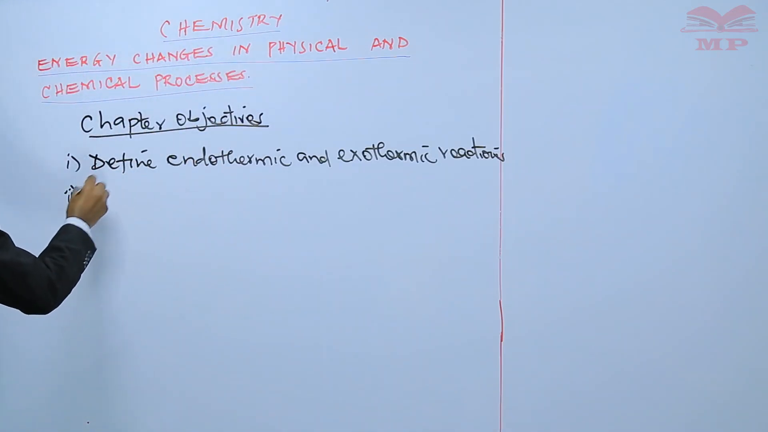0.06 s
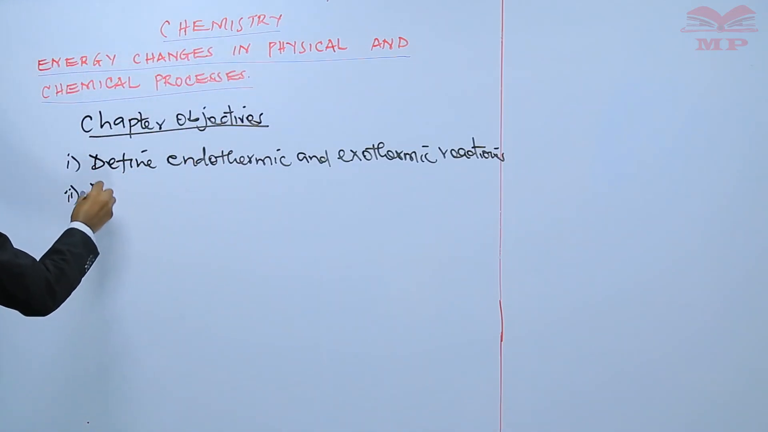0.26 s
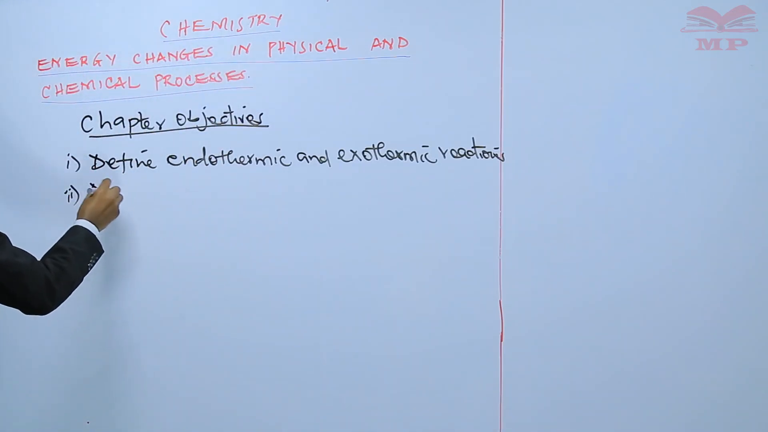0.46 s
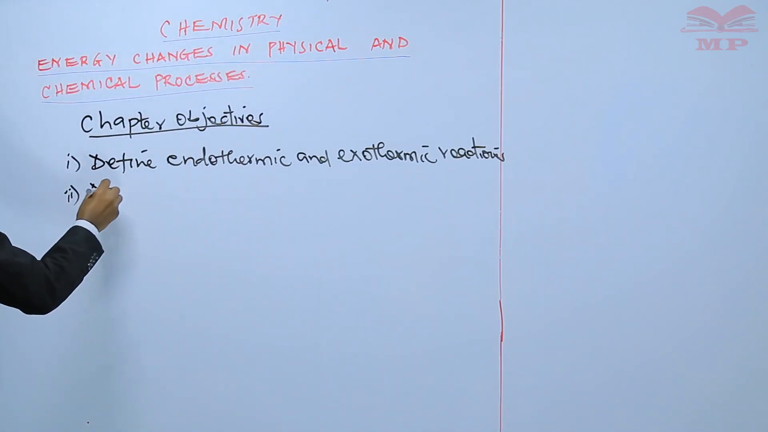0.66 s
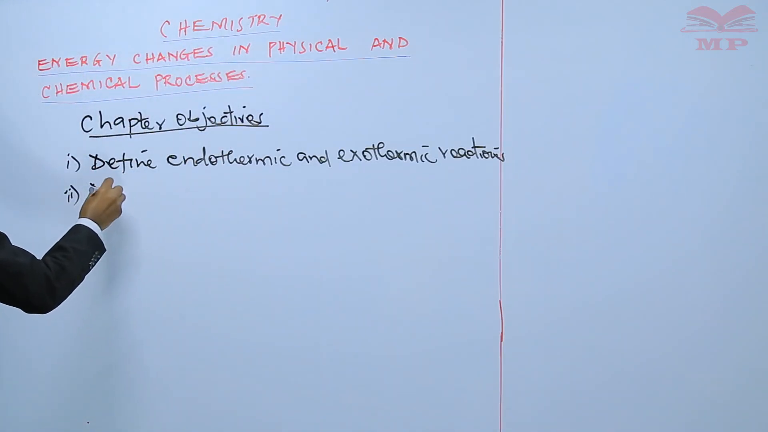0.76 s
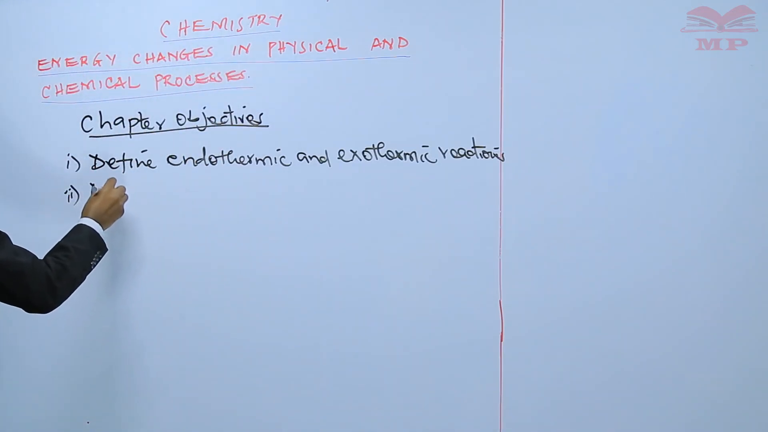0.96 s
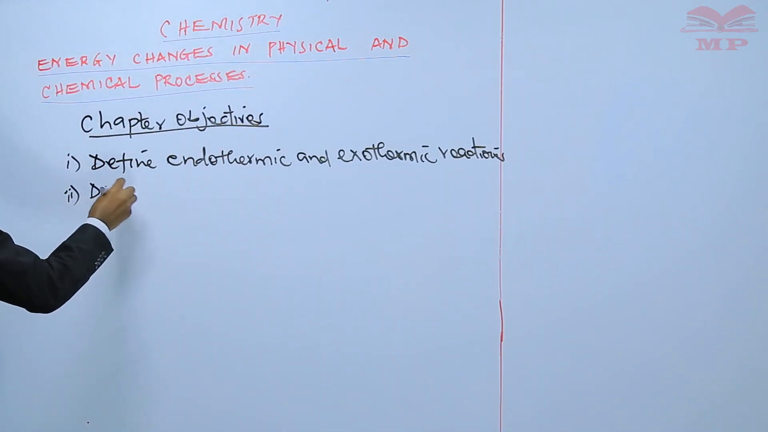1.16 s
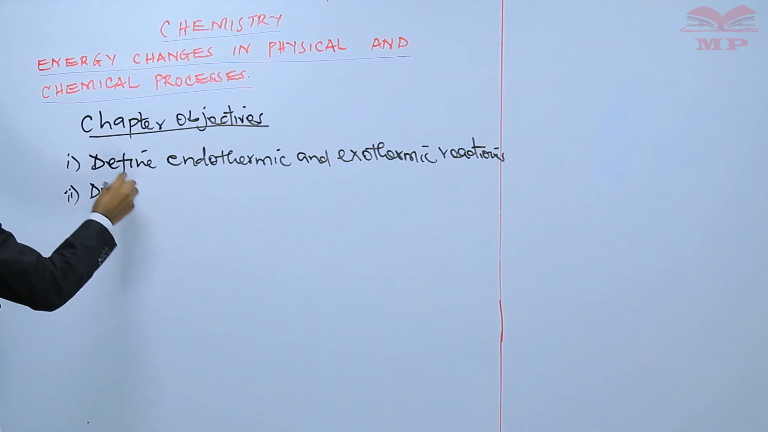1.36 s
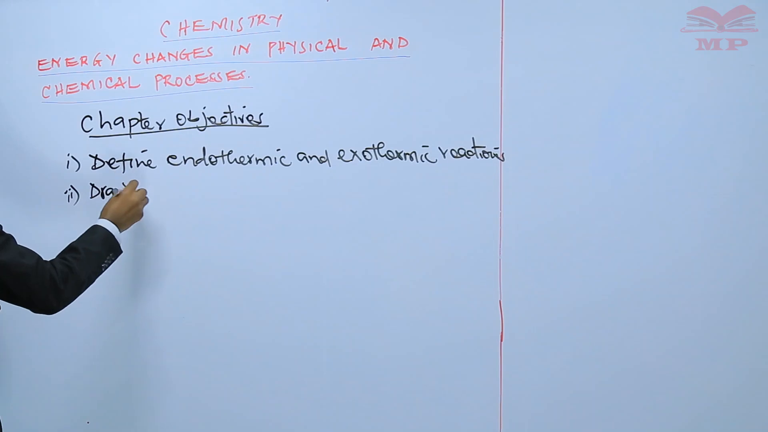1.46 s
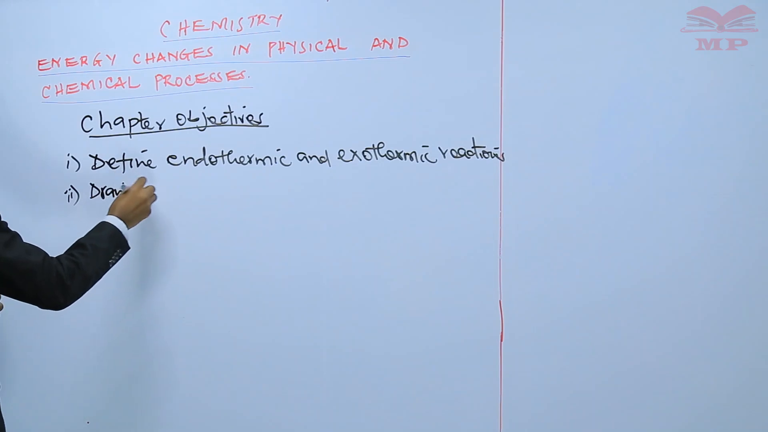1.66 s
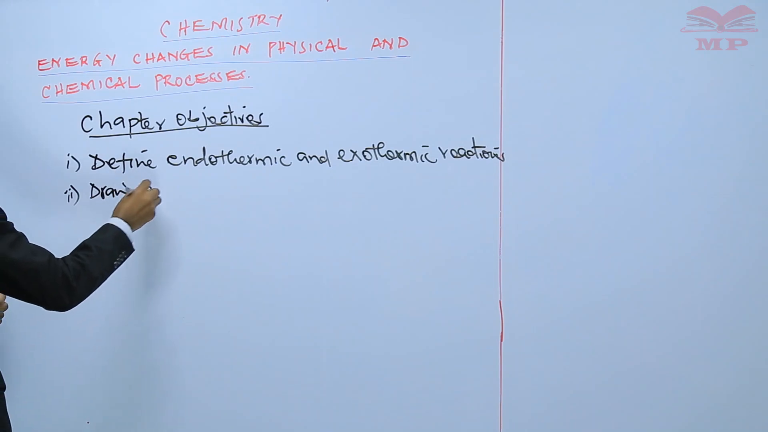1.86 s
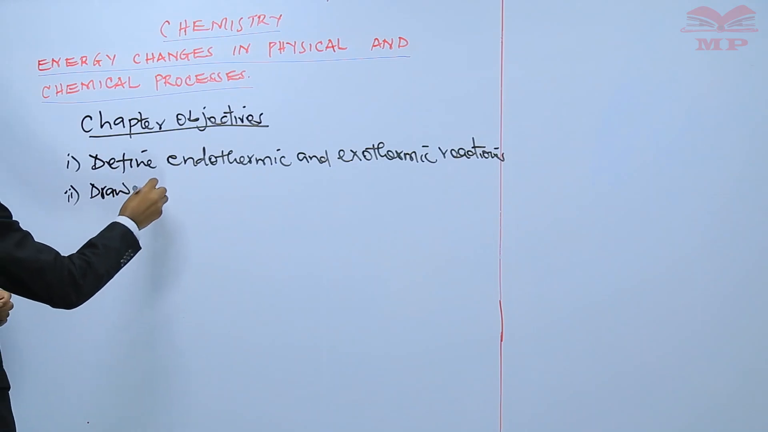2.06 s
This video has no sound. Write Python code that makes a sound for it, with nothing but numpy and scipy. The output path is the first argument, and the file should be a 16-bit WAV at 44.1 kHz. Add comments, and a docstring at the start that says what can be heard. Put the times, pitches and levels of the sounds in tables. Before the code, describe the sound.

Marker pen scratching short strokes on a thin whiteboard, brief squeaks and low thuds, quiet room.

```python
"""A felt marker writes quick strokes on a whiteboard, close up: tiny random slips ring its tip in a low,
a gliding middle and a high band, and make the thin board rumble and hiss. Stick-slip adds short squeaks,
gliding tones with one overtone. Soft contacts thud: a push, then decaying board modes. Once the hand
brushes the board, as noise in rising resonances. Behind lie a soft low rustle and a low thrum, both
filtered noise with drawn levels, and the shaped noise of a quiet classroom with a very short echo tail."""
import sys
import numpy as np
from scipy import signal
from scipy.fft import rfft, irfft
from scipy.io import wavfile
from scipy.ndimage import uniform_filter1d

SR = 44100
rng = np.random.default_rng(int(sys.argv[2]) if len(sys.argv) > 2 else 0)


def int16_out(signal):
    """Quantize to a 16-bit WAV file."""
    q = np.round(np.clip(np.atleast_2d(signal).T, -1, 1) * 32767)
    wavfile.write(sys.argv[1], SR, q.astype(np.int16))


N = 92610  # samples, 2.1 s


def amp(db):
    """Amplitude factor for a level in dB."""
    return 10 ** (np.asarray(db) / 20)


def evened(x):
    """Scales a sound to an RMS of one."""
    return x / np.sqrt(np.mean(x ** 2) + 1e-20)


def add(mix, start_s, sound):
    """Lays a sound into the mix at its start time, cut at the end of the mix."""
    part = mix[max(round(start_s * SR), 0):][:len(sound)]
    part += sound[:len(part)]


def resonate(x, hz, width):
    """A resonance, fixed or gliding, applied twice for steep sides: shift to 0 Hz, smooth, shift back."""
    turn = np.exp(2j * np.pi * np.cumsum(hz * np.ones(len(x))) / SR)
    r = np.exp(-np.pi * width / SR)
    smoothed = signal.lfilter([(1 - r) ** 2], [1, -2 * r, r * r], x / turn)
    return 2 * (turn * smoothed).real


def rings(x, table):
    """Sum of resonances of alternating sign, at an RMS of one."""
    return evened(sum((-1) ** k * amp(db) * resonate(x, hz, width)
                      for k, (hz, width, db) in enumerate(table)))


SWELL_POWER, FLOOR_SHARE = 2.0, 0.3  # sharpness of the peaked part; share of the flat-topped part


def swell(length, peak):
    """Pressure of one gesture: rises to the peak place and falls again."""
    u = np.arange(0, length, 1 / SR) / length
    peak = np.clip(peak, 0.05, 0.95)
    arch = np.sin(np.pi / 2 * np.minimum(u / peak, (1 - u) / (1 - peak)))
    flat_top = np.tanh(4 * arch)
    return FLOOR_SHARE * flat_top + (1 - FLOOR_SHARE) * arch ** SWELL_POWER


GRIT_DB, GUST_DB = 1.5, 1.5  # level spread in dB: grain (fast), gusts (slow)


def slips():
    """Dense tiny slips: noise of uneven size under a wavering pressure."""
    noise, fast, slow = rng.standard_normal((3, N))
    grit = GRIT_DB * evened(uniform_filter1d(fast, 60))
    gust = GUST_DB * evened(uniform_filter1d(slow, 600))
    return noise * amp(grit + gust)


# The pen strokes, each with its balance of tip bands and board rumble before the pressure swell:
# (start t/s, length t/s, peak place 0-1, low band level/dB, middle band level/dB, high band level/dB,
#  middle band start f/Hz, middle band end f/Hz, rumble drive level/dB)
PEN_STROKES = [(0.0, 0.087, 0.48, -66, -73, -63.5, 4630, 4460, -52.5),
               (0.216, .1, 0.26, -62, -83, -56.5, 4570, 4440, -49.5),
               (0.323, 0.12, 0.64, -66.5, -71.5, -61, 3420, 5140, -60.5),
               (0.57, 0.062, 0.1, -72.5, -77, -75.5, 4000, 4730, -62.5),
               (0.619, .1, 0.63, -64, -67.5, -66, 4030, 5200, -56),
               (0.71, 0.094, 0.55, -57, -60.5, -59, 3260, 4700, -55.5),
               (0.815, 0.086, 0.52, -68.5, -83, -67, 4600, 4600, -64.5),
               (1.017, 0.074, 0.31, -64.5, -85, -65, 3750, 3000, -56.5),
               (1.111, 0.073, 0, -69, -68.5, -66, 4540, 4450, -57),
               (1.165, 0.15, 0.68, -60, -65, -65, 4180, 4730, -56),
               (1.318, 0.073, 0.57, -67.5, -79.5, -72.5, 4640, 4300, -62),
               (1.696, .085, 0.52, -56.5, -57, -58.5, 4320, 5100, -45.5),
               (1.776, 0.12, 0.53, -68, -61, -58.5, 4200, 5160, -54),
               (1.856, 0.11, 0.66, -62.5, -61.5, -61.5, 4440, 4920, -70),
               (2.047, 0.094, 0.07, -69, -75.5, -68.5, 4800, 4720, -80)]
# Fixed rings of the felt tip, lower group: (f/Hz, width f/Hz per pass, relative level/dB)
LOW_TIP_RINGS = [(3150, 400, 0), (3650, 500, -1), (4150, 400, -6)]
# Fixed rings of the felt tip, upper group: (f/Hz, width f/Hz per pass, relative level/dB)
HIGH_TIP_RINGS = [(5665, 605, 5), (6374, 525, -2.5), (6896, 720, -6), (8450, 8000, -22)]
MID_WIDTH, NOTCH_HZ, NOTCH_Q, TIP_FROM_HZ = 750, 5230, 22, 2600  # width in Hz per pass
SKIN_HZ, SKIN_WIDTH, SKIN_DB = 1310, 1970, -5  # board skin: Hz, Hz per pass, gain in dB


def strokes():
    """Felt sliding: slips ring the tip and shake the board."""
    grit, hiss, shake = slips(), np.zeros(N), np.zeros(N)
    low = rings(slips(), LOW_TIP_RINGS)
    high = rings(slips(), HIGH_TIP_RINGS)
    for start, length, peak, low_db, mid_db, high_db, hz0, hz1, rumble_db in PEN_STROKES:
        shape = swell(length, peak)
        at = np.clip(round(start * SR) + np.arange(len(shape)), 0, N - 1)
        mid = evened(resonate(grit[at], np.linspace(hz0, hz1, len(at)), MID_WIDTH))
        tip = amp(low_db) * low[at] + amp(mid_db) * mid + amp(high_db) * high[at]
        add(hiss, start, shape * tip)
        add(shake, start, shape * amp(rumble_db))

    # the tip bands: one narrow notch, and nothing much below the low cut
    hiss = signal.lfilter(*signal.iirnotch(NOTCH_HZ, NOTCH_Q, fs=SR), hiss)
    b, a = signal.butter(2, TIP_FROM_HZ, "high", fs=SR)
    tip_hiss = signal.lfilter(b, a, hiss)

    # the board under the pen: its modes with 120 dB/s of extra damping
    t = np.arange(SR // 2) / SR
    drive = shake * rng.standard_normal(N)
    damped = board_ring() * amp(-120 * t)
    rumble = signal.fftconvolve(drive, damped / np.linalg.norm(damped))[:N]
    skin_hiss = amp(SKIN_DB) * resonate(drive, SKIN_HZ, SKIN_WIDTH)
    return tip_hiss + rumble + skin_hiss


# Short squeaks of the tip, level before a common lift and the fade-in and fade-out:
# (middle t/s, length t/s, start f/Hz, end f/Hz, level/dB, overtone relative level/dB,
#  roughness: 0 steady, 1 all flutter)
TIP_SQUEAKS = [(0.584, 0.025, 4100, 4710, -71.5, -33, 1.1), (0.668, .026, 4470, 4980, -56.5, -32, 0.3),
               (0.696, .03, 5400, 5850, -60, -26, 0.74), (0.755, .018, 4516, 4870, -41.5, -37, 0.06),
               (0.742, 0.011, 4500, 4230, -52, -30, 0.6), (0.765, 0.012, 4780, 4820, -49.5, -35, 0.2),
               (0.74, 0.027, 2936, 3190, -60.5, -22, 1), (0.798, .016, 2840, 2360, -53.5, -26, 0.31),
               (1.112, 0.017, 4500, 4170, -66, -30, 0.8), (1.171, .022, 2503, 2340, -49, -12.5, 0.14),
               (1.268, 0.0247, 3264, 3595, -59, -39, .9), (1.285, 0.0097, 2700, 2900, -52.5, -10, 0.2),
               (1.738, 0.044, 4400, 4846, -54.5, -26, 0.95), (1.845, .035, 4650, 4820, -63, -26, .6),
               (1.862, .016, 4850, 5400, -51.5, -29, 0.06)]
WAVER = 0.006  # RMS pitch wobble, share of the frequency
SQUEAK_LIFT_DB = 5.5


def squeaks():
    """Regular stick-slip: a short gliding whistle with one overtone."""
    out = np.zeros(N)
    wobble = evened(uniform_filter1d(rng.standard_normal(N), 120))
    flutter = evened(resonate(rng.standard_normal(N), 0, 440))  # low-passed noise
    for middle, length, hz0, hz1, db, over_db, rough in TIP_SQUEAKS:
        u = np.arange(0, length, 1 / SR) / length
        start = middle - length / 2
        first = round(start * SR)
        hz = (hz0 + (hz1 - hz0) * u) * (1 + WAVER * wobble[first:][:len(u)])
        grip = 1 - rough + rough * flutter[first:][:len(u)]
        turn = 2 * np.pi * np.cumsum(hz) / SR
        tone = np.sin(turn) + amp(over_db) * np.sin(2 * turn)
        fade = np.sin(np.pi * u) ** 1.25
        add(out, start, amp(db + SQUEAK_LIFT_DB) * grip * fade * tone)
    return out


# Modes of the thin board: (f/Hz, relative level/dB, time to fall by 60 dB t/s)
BOARD_MODES = [(50.6, -19.5, 0.77), (95.5, -14.5, 0.43), (115, -12, 0.38), (150, 1, .24), (163, -8, .3),
               (215.3, -6, 0.252), (278.5, -13.5, 0.17), (355, -8, 0.097), (407.4, -14.5, 0.17),
               (518, -16.5, 0.12)]
BUILD_CYCLES = 0.18  # build-up time constant, in cycles of each mode


def board_ring():
    """The board's answer to a short push; low modes take longer to build."""
    t = np.arange(SR // 2) / SR
    ring = np.zeros(len(t))
    for hz, db, t60 in BOARD_MODES:
        build = 1 - np.exp(-t * hz / BUILD_CYCLES)
        ring += amp(db - 60 * t / t60) * build * np.sin(2 * np.pi * hz * t)
    return ring


# Soft contacts with the board, level before the push and ring gains:
# (start t/s, level/dB, contact time t/ms: half the length of the whole push)
CONTACTS = [(.003, -46.5, 7), (0.2142, -26, 3.73), (0.997, -44, 8.6), (1.6897, -29.5, 3.92),
            (1.772, -38, 7.6), (2.045, -56.5, 1.2)]
PUSH_DB, RING_DB = 2, -1.5  # gains of the push and of the ringing modes


def knocks():
    """A soft contact pushes the board in, then its modes ring."""
    out, ring = np.zeros(N), board_ring()
    for start, db, contact_ms in CONTACTS:
        u = np.arange(0, 2 * contact_ms / 1000, 1 / SR) * 1000 / contact_ms - 1
        force = np.exp(-9 * u ** 2)
        push = (1 - 18 * u ** 2) * force  # the bell's curvature, sign turned
        add(out, start, -amp(db + PUSH_DB) * push)
        softened_ring = signal.fftconvolve(ring, force / force.sum())
        add(out, start + contact_ms / 2600, amp(db + RING_DB) * softened_ring)
    return out


# Resonances of the brushing hand: (start f/Hz, width f/Hz per pass, level/dB before the swell)
BRUSH_RINGS = [(797, 330, -59), (2140, 660, -61.5), (2660, 1300, -54.5)]
BRUSH_S, BRUSH_LENGTH_S, BRUSH_PEAK = 1.772, 0.093, 0.36  # start, length, peak place 0-1
BRUSH_RISE = 0.14  # share by which its rings climb


def brush():
    """The hand brushes along the board: one noise burst through rising resonances."""
    out, shape = np.zeros(N), swell(BRUSH_LENGTH_S, BRUSH_PEAK)
    noise = rng.standard_normal(len(shape))
    climb = np.linspace(1, 1 + BRUSH_RISE, len(shape))
    rub = sum(amp(db) * evened(resonate(noise, hz * climb, width)) for hz, width, db in BRUSH_RINGS)
    add(out, BRUSH_S, shape * rub)
    return out


# Level of the low rustle over time: (t/s, level/dB)
RUSTLE_CURVE = [(0, -66.5), (.15, -75), (.25, -69.5), (.5, -80), (.62, -74.5), (.68, -63.5), (.85, -68.5),
                (.98, -73), (1.1, -75.5), (1.28, -72.5), (1.4, -82.5), (1.65, -81.5), (1.75, -67),
                (1.88, -65), (1.95, -75.5), (2.1, -73)]
RUSTLE_HZ, RUSTLE_WIDTH = 310, 365  # width in Hz per pass


def rustle():
    """A soft low rustle around 310 Hz: uneven noise through one resonance, with its own drawn level."""
    t, db = np.transpose(RUSTLE_CURVE)
    level = amp(np.interp(np.arange(N) / SR, t, db))
    return level * evened(resonate(slips(), RUSTLE_HZ, RUSTLE_WIDTH))


# Level of the low thrum over time, before the final low cut: (t/s, level/dB)
THRUM_CURVE = [(0.0, -58), (0.16, -73), (0.26, -52), (0.5, -72), (0.69, -80), (0.77, -58), (1.24, -70.5),
               (1.3, -58), (1.48, -77), (1.65, -78), (1.74, -51), (2.1, -64)]
THRUM_HZ, THRUM_WIDTH = 54.5, 16  # width in Hz per pass


def thrum():
    """A low thrum near 54 Hz: noise through one narrow resonance, with a drawn level."""
    t, db = np.transpose(THRUM_CURVE)
    level = amp(np.interp(np.arange(N) / SR, t, db))
    return level * evened(resonate(rng.standard_normal(N), THRUM_HZ, THRUM_WIDTH))


# Spectrum of the room noise: (f/Hz, relative level/dB per Hz)
ROOM_SPECTRUM = [(35, -18), (52, 1), (65, -0.5), (80, 6.5), (150, 3), (200, -4.5), (270, -9.5), (500, -11),
                 (730, -11), (1440, -14.5), (5170, -24.5), (9000, -31), (15500, -30.5)]
# Slow swell of the room noise: (t/s, relative level/dB)
ROOM_CURVE = [(0, 2.5), (.5, 1.5), (.8, -0.5), (1.3, 1), (1.55, -0.5), (1.65, -3.5), (1.9, 2.5),
              (2.1, -0.5)]
ROOM_DB = -66.5  # level before the swell and the final low cut


def room_tone():
    """Quiet room noise, shaped in its spectrum, with a slow swell."""
    f, db = np.transpose(ROOM_SPECTRUM)
    t, swell_db = np.transpose(ROOM_CURVE)
    hz = np.fft.rfftfreq(N, 1 / SR)
    shape = amp(np.interp(np.log(hz + 1), np.log(f + 1), db))
    noise = irfft(rfft(rng.standard_normal(N)) * shape, N)
    return evened(noise) * amp(ROOM_DB + np.interp(np.arange(N) / SR, t, swell_db))


WET_DB, SIDE_DB, TAIL_S = -17.5, -44, 0.09  # tail gain, gain of its side part, time to fall by 60 dB


def scene():
    """Sums the near sounds, their short room tail and the background, with a faint stereo side."""
    near = strokes() + squeaks() + knocks() + brush()
    t = np.arange(SR // 2) / SR
    # noise tails, silent for the first 8 ms
    tails = rng.standard_normal((2, len(t))) * amp(-60 * t / TAIL_S) * (t > 0.008)
    tails = tails / np.linalg.norm(tails[0])
    wet, apart = signal.fftconvolve(near[None], tails, axes=1)[:, :N]
    mono = near + amp(WET_DB) * wet + room_tone() + thrum() + rustle()
    side = amp(SIDE_DB) * apart
    return np.array([mono + side, mono - side])


HISS_DB, HISS_FROM_HZ = -85, 4400
LOW_CUT_HZ, EDGE_HZ = 47.3, 15750  # low cut of each of two passes; upper band limit


def record(dry):
    """A double low cut, a faint hiss of opposite sign in the two channels, then the band limit."""
    b, a = signal.butter(1, HISS_FROM_HZ, "high", fs=SR)
    hiss = evened(signal.lfilter(b, a, rng.standard_normal(N)))
    cut = signal.butter(2, LOW_CUT_HZ, "high", fs=SR, output="sos")
    dry = signal.sosfilt(cut, signal.sosfilt(cut, dry))
    wired = dry + amp(HISS_DB) * np.array([hiss, -hiss])
    band = signal.firwin(1023, EDGE_HZ, window=("kaiser", 9), fs=SR)
    return signal.oaconvolve(wired, band[None], "same")


dry = scene()
out = record(dry)
int16_out(out)
```